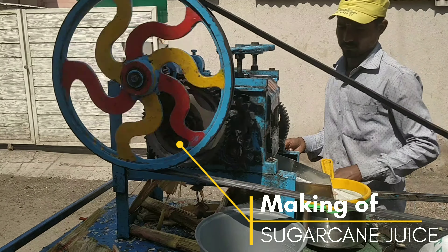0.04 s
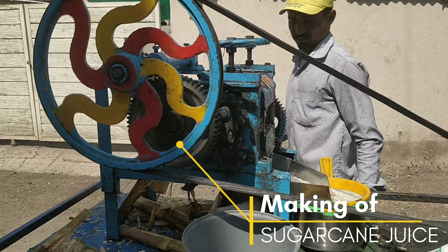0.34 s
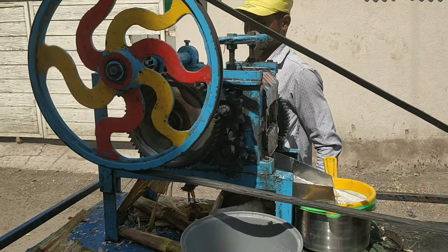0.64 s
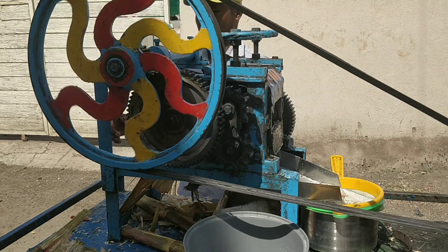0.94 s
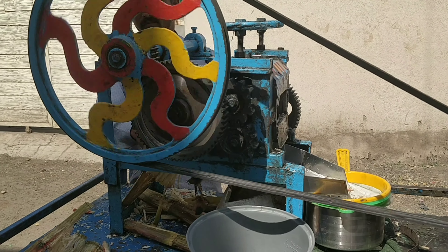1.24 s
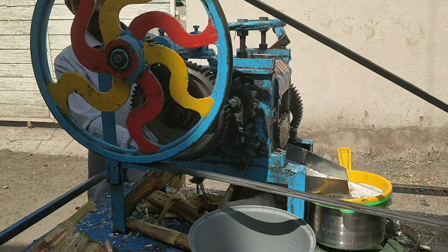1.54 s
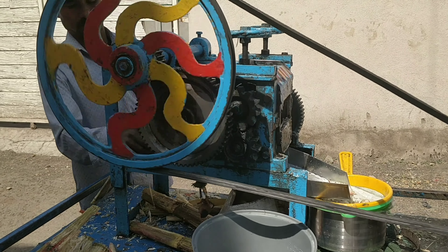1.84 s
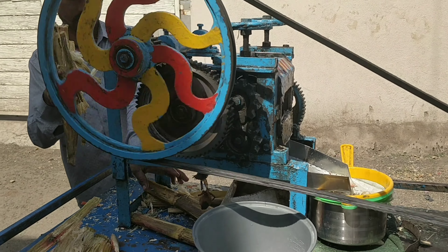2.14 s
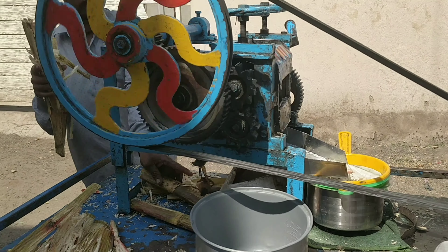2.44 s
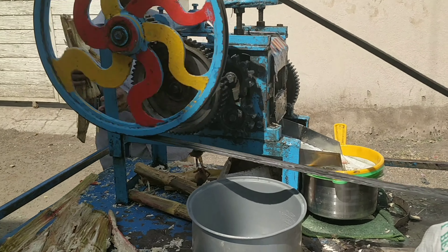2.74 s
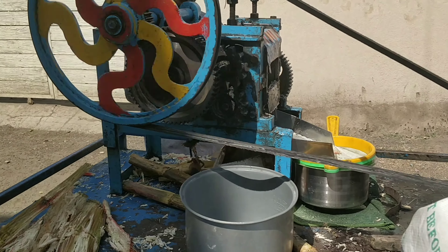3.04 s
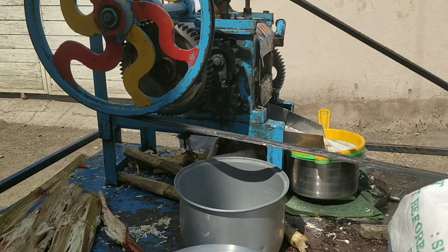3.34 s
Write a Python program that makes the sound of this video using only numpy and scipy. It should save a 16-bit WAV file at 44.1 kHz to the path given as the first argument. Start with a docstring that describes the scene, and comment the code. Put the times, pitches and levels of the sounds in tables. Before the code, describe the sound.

An engine-driven sugarcane press runs close by, thudding and rattling with short gear squeals.

```python
"""A sugarcane press at a roadside, four seconds on one microphone, close by.
From the start its single-cylinder engine thuds once a turn and the valve gear clatters; the open gears
rumble, their dry teeth scrape in short ringing squeals, and loose iron rattles and now and then clanks.
From 1.6 to 2.8 s the rollers bump four times as they bite; after that the frame gives a few dull clangs,
and the press runs on."""
import sys
import numpy as np
from scipy import signal
from scipy.fft import rfft, irfft
from scipy.io import wavfile
from scipy.ndimage import uniform_filter1d, minimum_filter1d

SR = 44100
rng = np.random.default_rng(int(sys.argv[2]) if len(sys.argv) > 2 else 0)


def pcm_store(signal):
    """Save signal as 16-bit PCM."""
    levels = np.round(np.clip(np.atleast_2d(signal), -1, 1) * 32767)
    wavfile.write(sys.argv[1], SR, levels.astype(np.int16).T)


N = 176400
T = np.arange(N) / SR
CRANK_HZ, SPEED_WANDER = 18.665, 0.0032

# engine hum: crank_multiple, relative_db
HUM_HARMONICS = [(1, -43.5), (2, -25.5), (4, -23.5), (5, -19), (6, -18), (7, -33.5), (8, -29.5), (9, -34),
                 (10, -19), (11, -21.5), (18, -37)]
# spectrum of the engine's thuds: frequency_hz, relative_db
THUD_SPECTRUM = [(20, -42.5), (55, -29), (75, 6.5), (100, -11.5), (150, -10.5), (205, 4.5), (245, -19),
                 (400, -13.5), (900, -44)]
# valve and injector knocks over one engine cycle of two turns: cycle_share, relative_db
VALVE_KNOCKS = [(.07, -1), (.29, -3), (.55, -9), (.77, -3), (.98, -7.5)]
# spectrum of those knocks: frequency_hz, relative_db
KNOCK_SPECTRUM = [(150, -26.5), (300, 1.5), (520, -2.5), (1020, -9.5), (1330, 0), (1600, -14),
                  (8000, -54.5)]
# ticks of the valve gear: cycle_share, relative_db
VALVE_TICKS = [(.08, 3), (.38, -3.5), (.62, -5), (.78, -2), (.89, 4)]
# rumble of gears and frame: frequency_hz, relative_db
RUMBLE_SPECTRUM = [(20, -45.5), (45, -30), (70, -19), (100, 1.5), (200, 2), (245, -5.5), (330, -1),
                   (510, -7.5), (630, -9.5), (1020, -21.5), (1320, -17.5), (1550, -23.5), (3400, -27.5),
                   (5500, -26.5), (7200, -36), (9000, -58.5)]
# bright rattle of loose iron: frequency_hz, relative_db
RATTLE_SPECTRUM = [(500, -37.5), (1500, -12), (3600, -7), (4100, -2.5), (5500, 6.5), (6400, -5.5),
                   (7200, -2), (9000, -35.5)]
# ringing of the rattled frame: pitch_hz, width_hz, level_db
FRAME_MODES = [(498.3, 8.4, -29), (805, 5.5, -38), (1312, 73, -33.5), (1930, 54, -45.5), (2385, 25, -40.5),
               (2740, 14, -34), (4074, 45, -39), (5020, 19, -38), (5820, 9.7, -47), (7330, 29, -54)]
# squeals of the gear teeth: start_s, length_s, main_drive_db, low_drive_db, high_drive_db
TOOTH_SQUEALS = [(0.007, 0.094, -19, -33.5, -45.5), (0.186, 0.025, -21, -42, -44),
                 (0.543, 0.14, -22.5, -52, -41), (0.779, 0.069, -18.5, -32, -31.5),
                 (0.873, 0.025, -22, -43, -40), (0.937, 0.056, -20.5, -46, -43.5),
                 (1.225, 0.1, -27, -35, -40), (1.434, 0.042, -20, -50, -33),
                 (1.66, 0.18, -22, -33.5, -36.5), (1.916, 0.031, -20.5, -37, -45),
                 (2.014, 0.012, -20.5, -45, -44), (2.09, 0.087, -24, -44, -47),
                 (2.221, 0.022, -17, -45, -34), (2.309, 0.17, -22, -34, -41.5),
                 (2.738, 0.037, -19, -48, -47), (2.928, 0.05, -25.5, -26.5, -45),
                 (2.998, 0.052, -23, -33, -39), (3.13, 0.07, -24.5, -30, -52),
                 (3.407, 0.14, -25.5, -50, -39), (3.625, 0.038, -25.5, -35, -42),
                 (3.826, 0.033, -26, -56, -51)]
# a scraped gear's main, low and two high tones: pitch_hz, flutter_hz, roughness, gain_db
GEAR_MODES = [(2746, 58, 1.5, 2), (2365, 35, 1.1, 3), (6720, 43, 1.5, 6.5), (6020, 80, 1.7, 3)]
# clanks of loose iron: start_s, relative_db
IRON_CLANKS = [(0.2603, -11.5), (0.5638, -12.5), (0.783, -12.5), (0.815, -15.5), (0.9395, -11),
               (1.2445, -9), (1.722, -11.5), (2.0185, -11), (2.906, -11), (3.36, -13), (3.452, -13),
               (3.6266, -14), (3.8985, -14.5)]
# noisy part of a clank: frequency_hz, relative_db
CLANK_SPECTRUM = [(3400, -11.5), (4100, -8), (5600, 0.5), (6400, -10.5), (8000, -29)]
# dull clangs of the frame: start_s, level_db
FRAME_CLANGS = [(.065, -19), (2.78, -16.5), (3.097, -17.5), (3.185, -20), (3.588, -17.5)]
# heavy bumps of the rollers as they bite: start_s, level_db
ROLLER_BUMPS = [(1.59, -10), (1.9, -15), (2.595, -8.5), (2.77, -11)]
# swell and fade of a rubbing wheel: time_s, relative_db
WHEEL_LEVELS = [(0, -42), (.28, -33.5), (.65, -36.5), (1.5, -27.5), (1.75, -47), (1.93, -32.5), (2.15, -44),
                (2.42, -31), (2.9, -51), (3.25, -43), (4, -51)]


def engine_hum():
    """Harmonics of the crank, whose speed wanders a little."""
    turns = np.cumsum(CRANK_HZ * (1 + SPEED_WANDER * drift(hz=1.63))) / SR
    hum = sum(amp(db) * np.cos(2 * np.pi * (k * turns + rng.random())) for k, db in HUM_HARMONICS)
    return amp(-16.5) * unit(hum)


def engine_thuds(first_s=.042, width_s=.0033, rebound_s=.012, rebound_gain=.84, low_cut_hz=60.4):
    """A thud and its rebound on every turn: two short pulses of deep noise."""
    offset_s = (((T - first_s) * CRANK_HZ + .5) % 1 - .5) / CRANK_HZ  # from the nearest thud
    push = np.exp(-(offset_s / width_s) ** 2)
    rebound = rebound_gain * np.exp(-((offset_s - rebound_s) / width_s) ** 2)
    body = colour(rng.standard_normal(N), THUD_SPECTRUM)
    body /= abs(signal.hilbert(body)) + 1  # evens out the strength of the thuds
    low_cut = signal.butter(3, low_cut_hz, "high", fs=SR, output="sos")
    return amp(-18.5) * unit(signal.sosfilt(low_cut, (push + rebound) * body))


def valve_gear():
    """Valves and injector knock and tick in the same pattern every engine cycle."""
    knocks = bursts(cycle_hits(VALVE_KNOCKS, spread_db=6, jitter_s=.0012), decay_s=.0027)
    ticks = bursts(cycle_hits(VALVE_TICKS, spread_db=2, jitter_s=.0016), decay_s=.0035)
    return amp(-31) * colour(knocks, KNOCK_SPECTRUM) + amp(-32.5) * colour(ticks, RATTLE_SPECTRUM)


def press():
    """The gears rumble, loose parts rattle, and the iron frame rings under small blows."""
    rumble = colour(rng.standard_normal(N) * amp(2 * drift(hz=39.8)), RUMBLE_SPECTRUM)
    chatter = bursts(strikes(per_s=180, spread_db=9.5), decay_s=.0033)
    rattle = colour(chatter * amp(4.2 * drift(hz=2.4)), RATTLE_SPECTRUM)
    frame = sum(amp(db) * ring(strikes(per_s=90, spread_db=5.5), hz, width_hz)
                for hz, width_hz, db in FRAME_MODES)
    return amp(-14) * rumble + amp(-34) * rattle + frame


def gear_squeals(rise_s=.00064, fall_s=.02, sag_db_per_s=17.5, detune=.0026):
    """Dry teeth bite, ring the gear and slide off; each contact favours other tones."""
    squeals = np.zeros(N)
    for start_s, length_s, main_db, low_db, high_db in TOOTH_SQUEALS:
        t = np.arange(0, length_s + .1, 1 / SR)
        tone = np.zeros(len(t))
        for (hz, flutter_hz, rough, db), drive_db in zip(GEAR_MODES, (main_db, low_db, high_db, high_db)):
            pitch_hz = hz * (1 + detune * rng.standard_normal())
            tone += amp(drive_db + db) * sing(pitch_hz, flutter_hz, rough, size=len(t))
        bite = np.minimum(t / rise_s, 1)
        sag = amp(-sag_db_per_s * (t - length_s / 2))
        release = np.exp(-np.maximum(t - length_s, 0) / fall_s)
        add(squeals, start_s, tone * bite * sag * release)
    return squeals


def iron_clanks(ring_above_hz=3500):
    """Loose iron clashes: bright noise mixed with the frame's highest modes."""
    modes = sum(ring(rng.standard_normal(N), hz, width_hz)
                for hz, width_hz, _ in FRAME_MODES if hz > ring_above_hz)
    clash = colour(rng.standard_normal(N), CLANK_SPECTRUM) + amp(-8.5) * unit(modes)
    return amp(-3) * blows(IRON_CLANKS, decay_s=.016) * unit(clash)


def frame_clangs():
    """Harder blows draw a dull, short tone from the frame."""
    return blows(FRAME_CLANGS, decay_s=.022) * sing(hz=1320, flutter_hz=40, rough=.83)


def roller_bumps():
    """The rollers bite with a deep bump."""
    return blows(ROLLER_BUMPS, decay_s=.036) * sing(hz=200, flutter_hz=40, rough=.69)


def jingle(low_hz=3900, high_hz=7400, count=36):
    """Many small loose parts, each ringing briefly at its own pitch when it is shaken."""
    parts = sum(ring(strikes(per_s=12, spread_db=4), hz * rng.uniform(1, 1.01), width_hz=55)
                for hz in np.linspace(low_hz, high_hz, count))
    return amp(-30) * colour(parts, RATTLE_SPECTRUM)


def rubbing_wheel():
    """Faint behind the gears, a wheel catches, scrapes and sings."""
    scrape = amp(-2) * sing(hz=2080, flutter_hz=220, rough=10)
    catch = unit(amp(4 * drift(hz=10)))
    tone = sing(hz=2186, flutter_hz=5, rough=6)
    swell = amp(np.interp(T, *np.transpose(WHEEL_LEVELS)))
    return swell * catch * (tone + scrape)


def sing(hz, flutter_hz, rough, size=N):
    """The tone of a vibrating part: steady at heart, fluttering in strength and phase."""
    t = np.arange(size) / SR
    noise = rng.standard_normal(size) + 1j * rng.standard_normal(size)
    rolloff = 1 + (np.fft.fftfreq(size, 1 / SR) / flutter_hz) ** 2
    flutter = np.fft.ifft(np.fft.fft(noise) / rolloff)
    flutter /= np.sqrt(np.mean(abs(flutter) ** 2))
    steady = np.exp(2j * np.pi * (hz * t + rng.random()))
    return unit(((1 + rough * flutter) * steady).real)


def ring(x, hz, width_hz):
    """One decaying mode driven by x, at an rms of one."""
    pole = np.exp((2j * np.pi * hz - np.pi * width_hz) / SR)
    return unit(signal.lfilter([1], [1, -pole], x).imag)


def blows(table, decay_s):
    """Envelope of a series of blows, each dying away."""
    return sum(amp(db) * (T >= start_s) * np.exp(-abs(T - start_s) / decay_s) for start_s, db in table)


def cycle_hits(table, spread_db, jitter_s):
    """Impulses that recur every two turns of the crank, a little uneven."""
    hits = np.zeros(N)
    for cycle in range(int(N / SR * CRANK_HZ / 2) + 1):
        for share, db in table:
            start_s = (cycle + share) * 2 / CRANK_HZ + jitter_s * rng.standard_normal()
            add(hits, start_s, amp([db + spread_db * rng.uniform(-.38, 1)]))
    return hits


def strikes(per_s, spread_db):
    """Random impulses of uneven strength."""
    return (rng.random(N) < per_s / SR) * amp(spread_db * rng.uniform(-1.4, 1, N))


def bursts(hits, decay_s):
    """Each impulse becomes a short dying burst of noise."""
    envelope = signal.lfilter([1], [1, -np.exp(-1 / (decay_s * SR))], hits + 1e-12)
    return envelope * rng.standard_normal(N)


def colour(x, spectrum, size=8192):
    """Shapes x with a minimum-phase filter, to an rms of one."""
    hz, db = np.transpose(spectrum)
    log_hz = np.log(abs(np.fft.fftfreq(size, 1 / SR)) + 1)
    log_gain = np.log(amp(np.interp(log_hz, np.log(hz), db)))
    response = np.exp(np.conj(signal.hilbert(log_gain)))
    taps = np.fft.ifft(response).real[:size // 2]
    return unit(signal.fftconvolve(x, taps)[:N])


def drift(hz):
    """Bounded random motion up to about this rate."""
    rolloff = 1 + (np.fft.rfftfreq(N, 1 / SR) / hz) ** 4
    wander = unit(irfft(rfft(rng.standard_normal(N)) / rolloff, N))
    return unit(np.tanh(wander / 2))


def add(mix, start_s, sound):
    """Mixes a sound in at a time."""
    part = mix[max(round(start_s * SR), 0):][:len(sound)]
    part += sound[:len(part)]


def amp(db):
    """Decibels to gain."""
    return 10 ** (np.asarray(db) / 20)


def unit(x):
    """Scales to an rms of one."""
    return x / np.sqrt(np.mean(x ** 2) + 1e-20)


def scene():
    """Engine and press from close by, in mono."""
    engine = engine_hum() + engine_thuds() + valve_gear()
    machinery = press() + jingle() + rubbing_wheel() + gear_squeals()
    impacts = iron_clanks() + frame_clangs() + roller_bumps()
    return (engine + machinery + impacts)[None]


def record(dry, low_cut_hz=30, ceiling=.95, high_cut_hz=8080):
    """The microphone drops the deepest bass, a fast limiter holds the peaks, the top treble is cut."""
    mic = signal.sosfilt(signal.butter(2, low_cut_hz, "high", fs=SR, output="sos"), dry)
    gain = np.minimum(1, ceiling / (abs(mic[0]) + 1e-9))
    limited = mic * uniform_filter1d(minimum_filter1d(gain, size=120), size=120)
    high_cut = signal.firwin(221, high_cut_hz, window=("kaiser", 9), fs=SR)
    return signal.oaconvolve(limited, high_cut[None], "same")


dry = scene()
out = record(dry)
pcm_store(out)
```